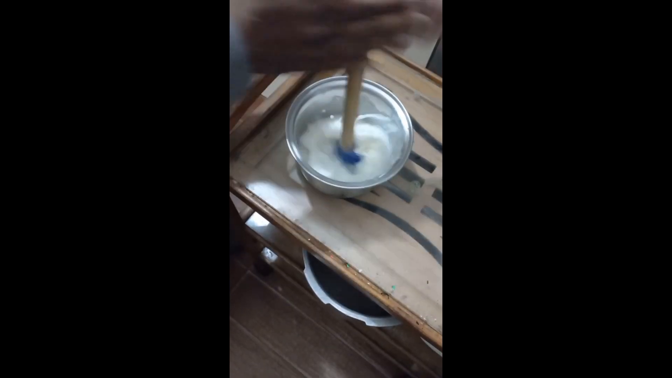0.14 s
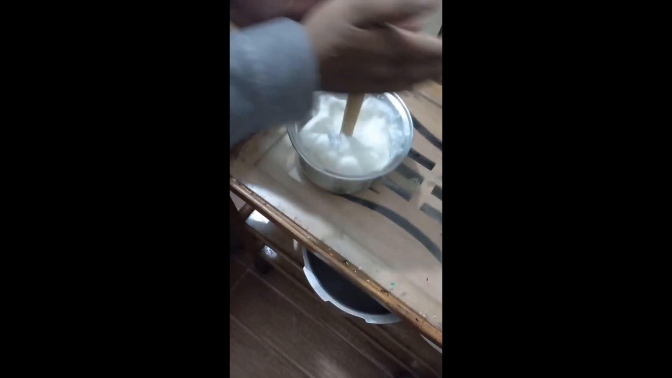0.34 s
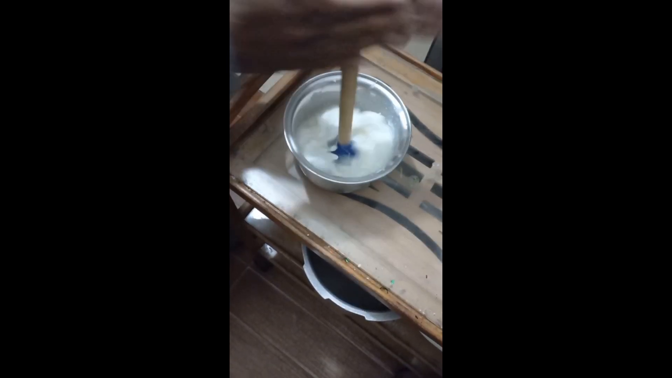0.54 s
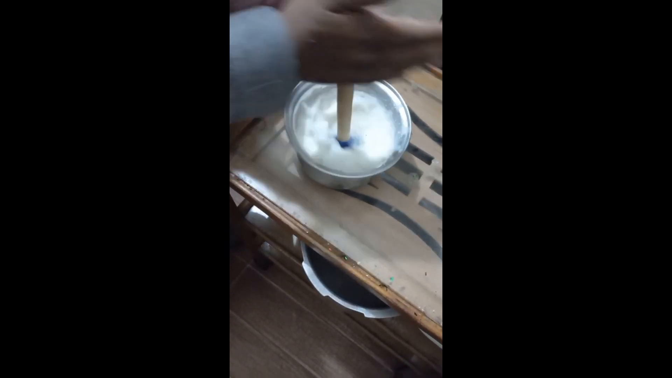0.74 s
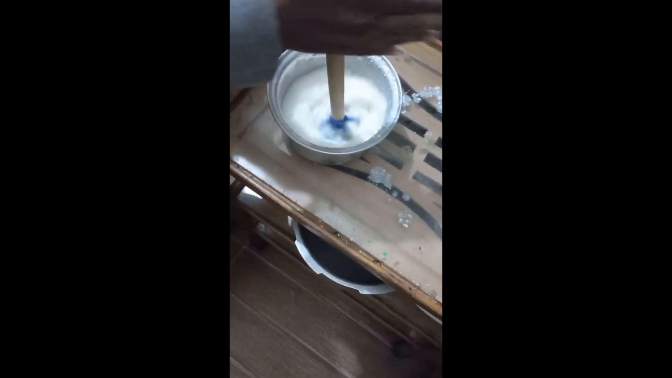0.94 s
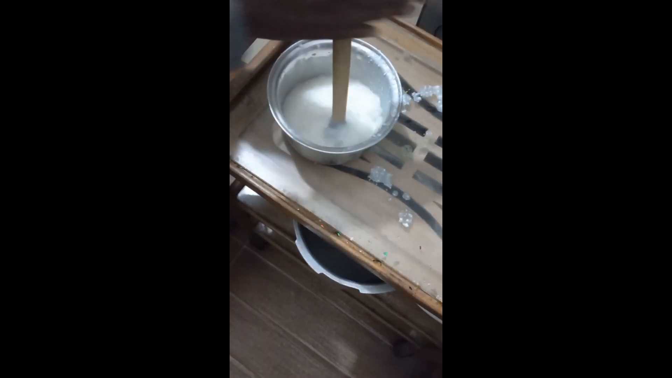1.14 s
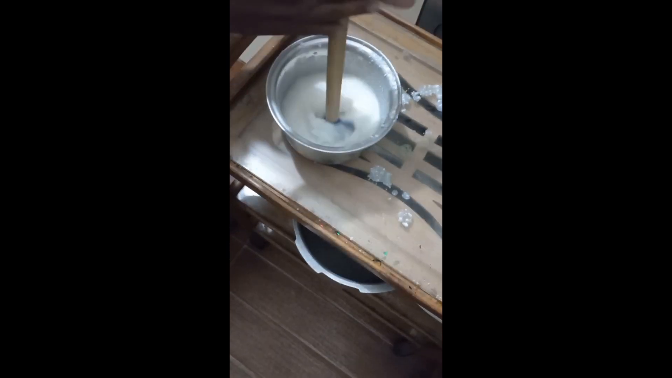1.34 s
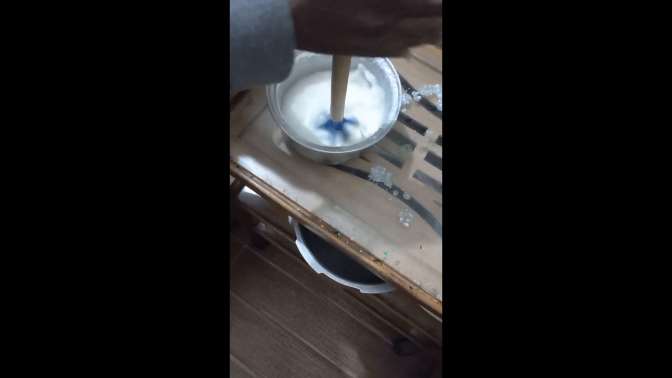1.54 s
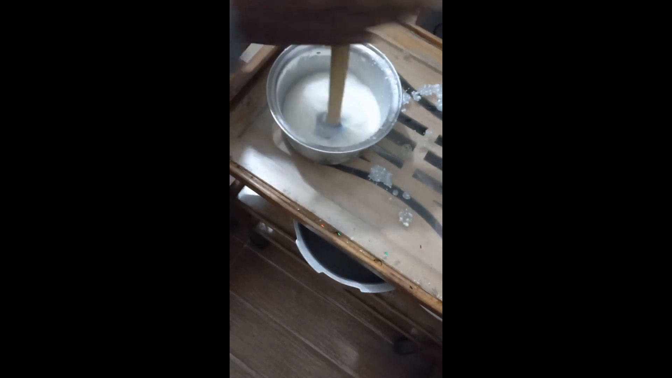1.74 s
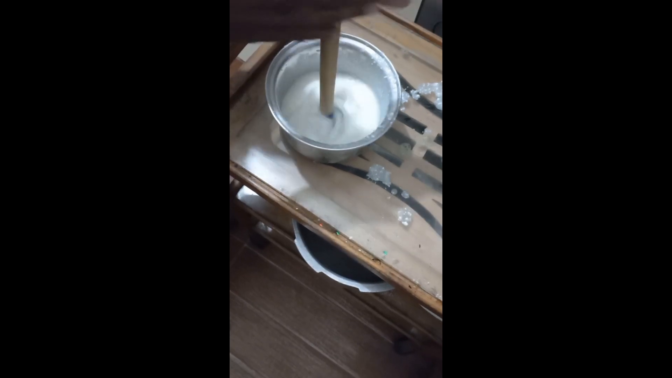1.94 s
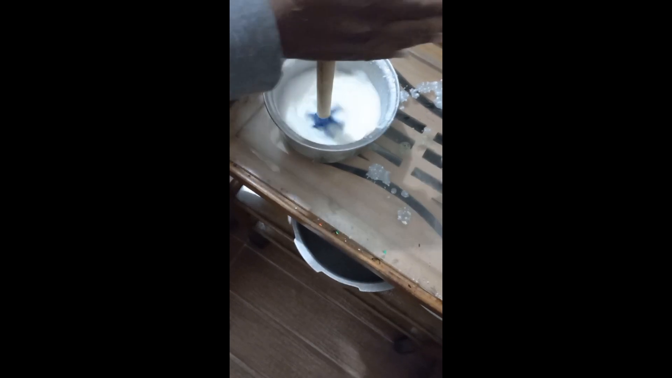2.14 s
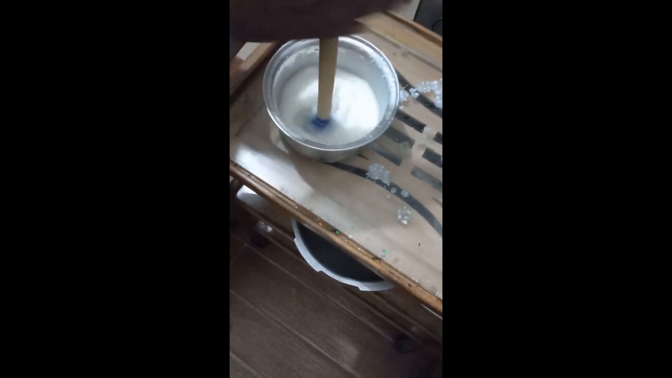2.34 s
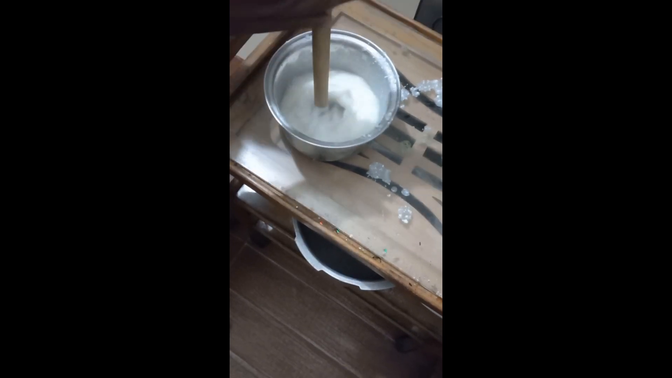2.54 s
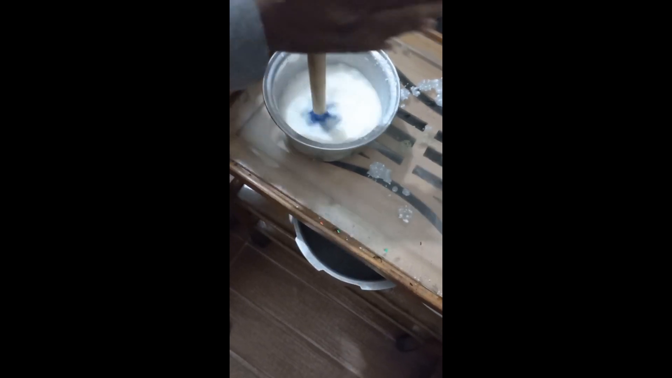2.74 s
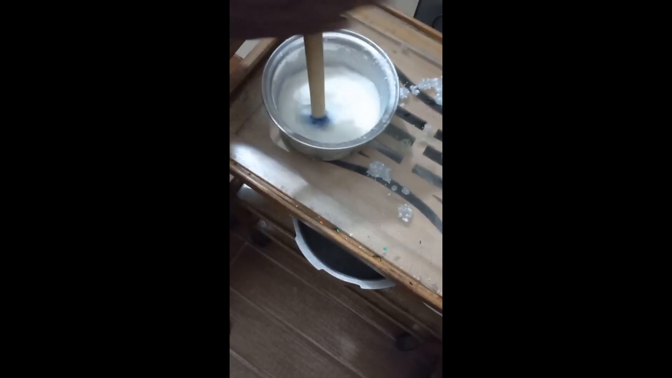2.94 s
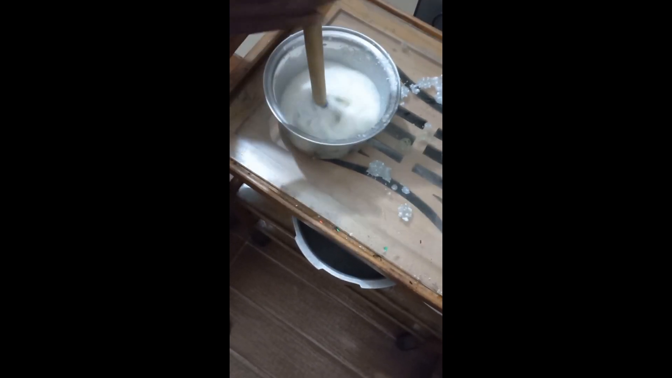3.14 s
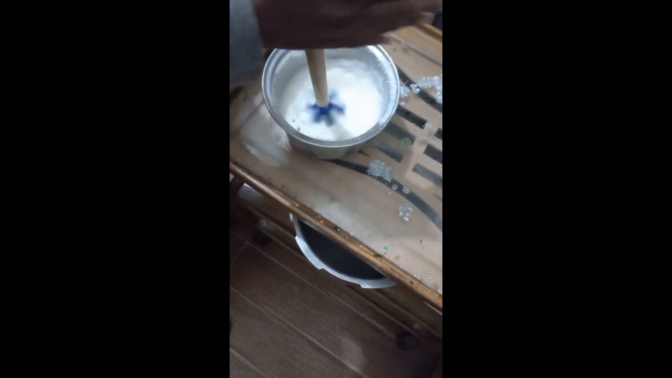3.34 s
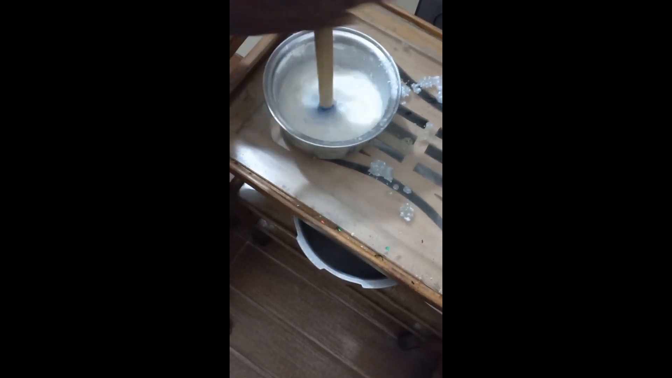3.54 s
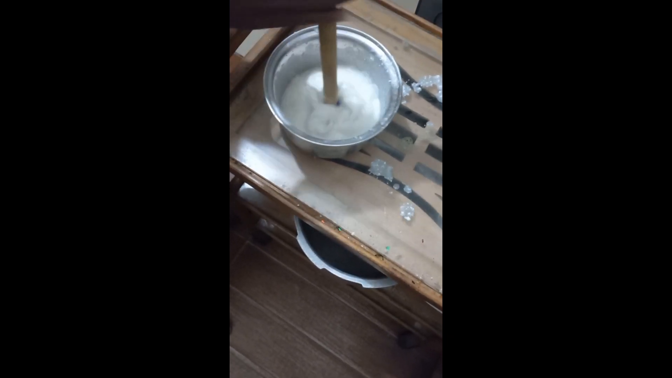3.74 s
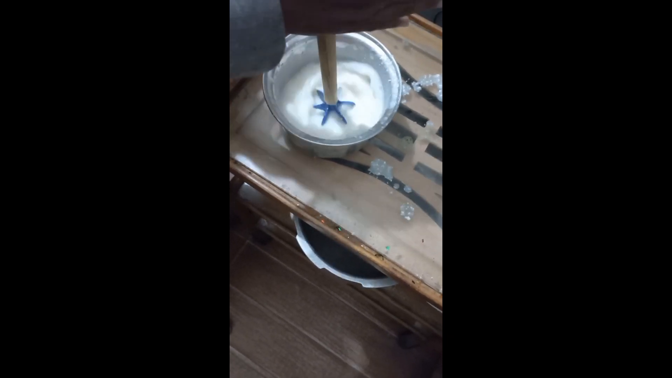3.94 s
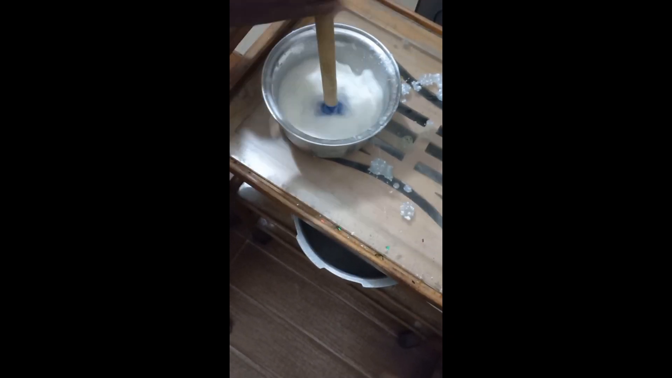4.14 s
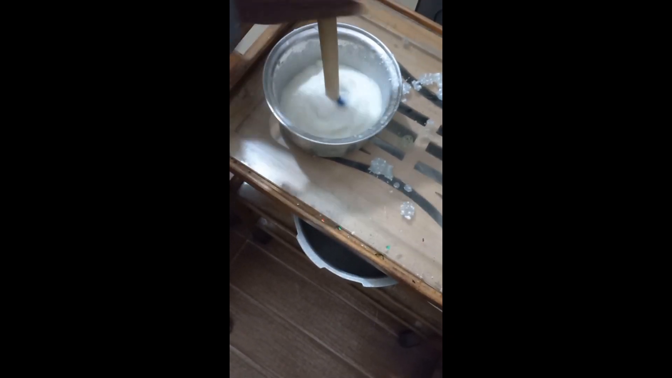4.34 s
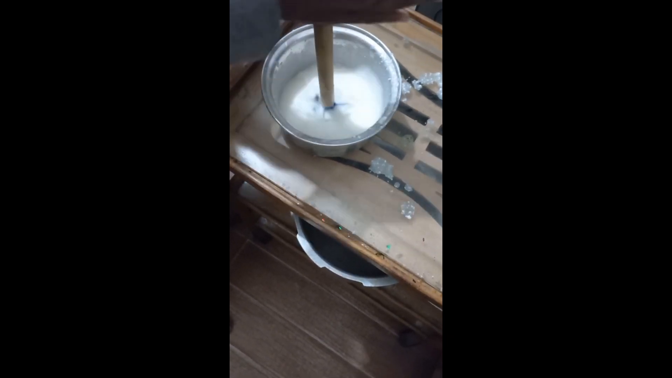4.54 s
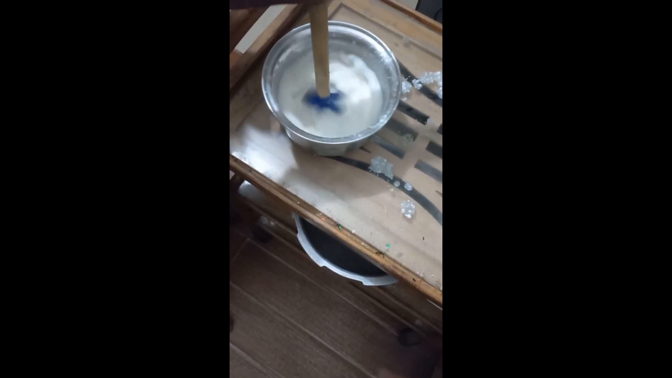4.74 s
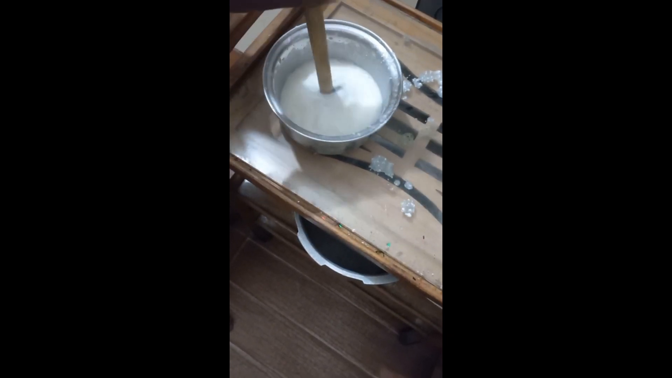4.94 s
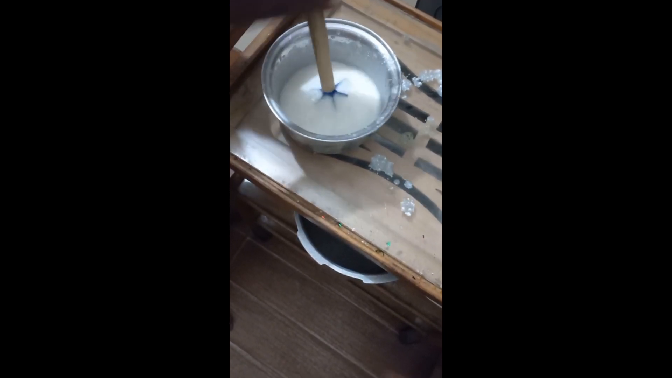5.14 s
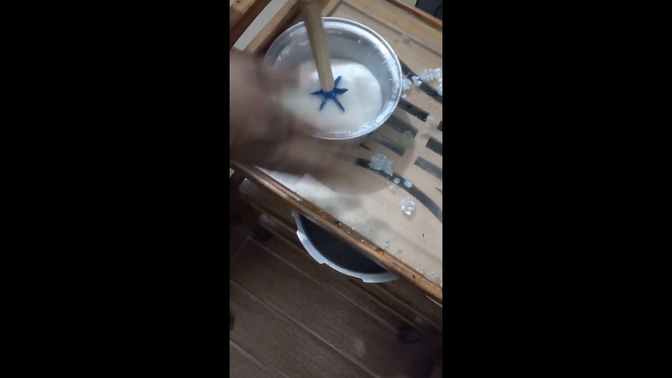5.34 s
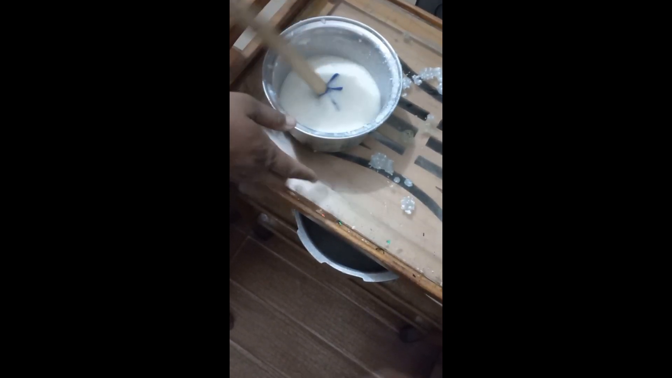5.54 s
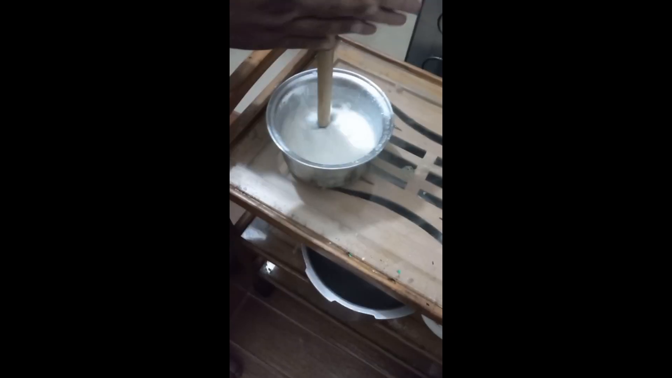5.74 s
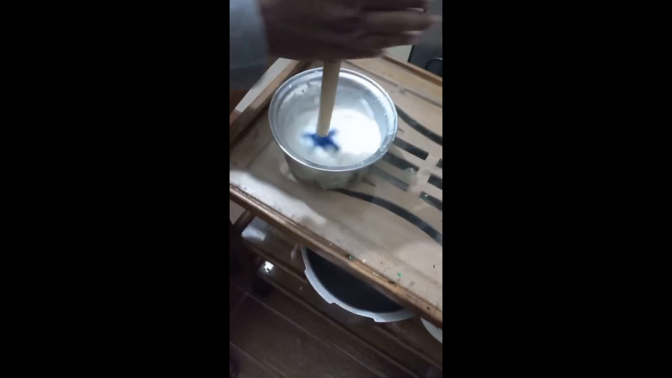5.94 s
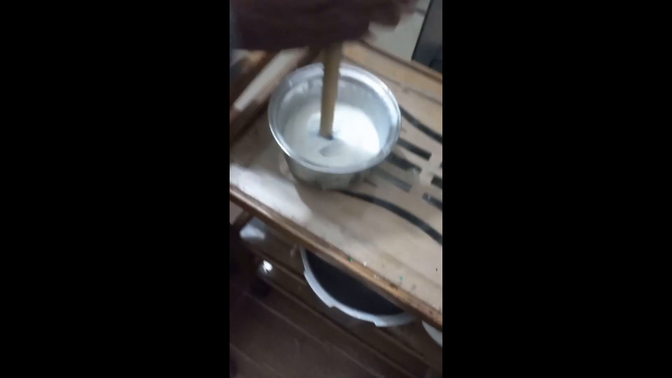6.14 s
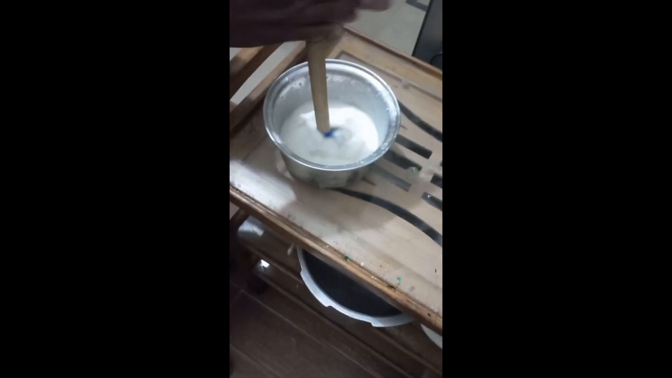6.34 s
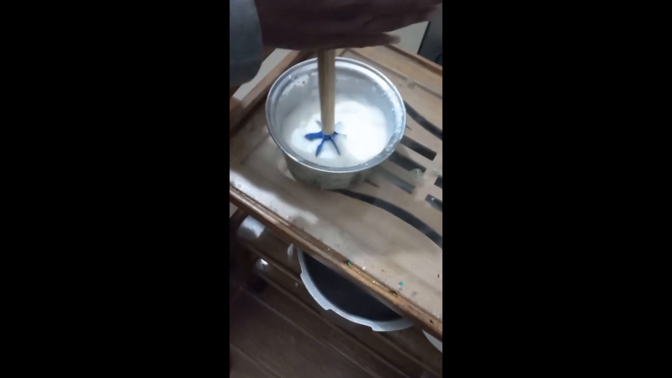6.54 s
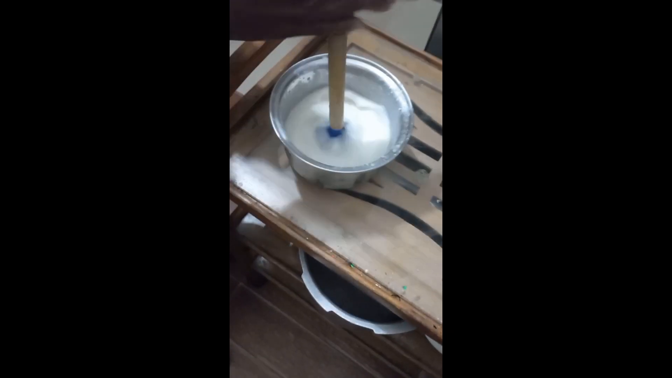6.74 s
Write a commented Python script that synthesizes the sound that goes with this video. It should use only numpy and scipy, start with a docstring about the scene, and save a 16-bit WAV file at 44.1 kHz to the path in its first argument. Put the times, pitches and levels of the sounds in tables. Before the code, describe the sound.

In a small quiet kitchen, two close microphones hear thick liquid being churned in a steel pot on a wooden table. From 0 to 0.78 seconds the strokes are loudest, dense and splashy, with popping bubbles, spray hiss and bright ticks on steel; a low table hum swells near 0.4. At 0.78 the sound cuts abruptly into a slightly softer passage. Until about 4.75, palm strokes come every 0.3 seconds, each a quick frothy gurgle with hollow metallic ringing and a short fall, some deeper, some fizzier, with stray bubbles and ticks between. From 4.8 to 5.59 the churning nearly vanishes, leaving faint air, tiny drips and table hum. At 5.59 wet sound jumps in suddenly, the table hums again around 5.7, and gentler, thinner strokes resume around 5.9, 6.2, 6.45 and 6.73, with bright bubbles and light ticks until the end at about 7.

```python
"""Churning thick liquid by hand

A wooden churner is rolled between the palms in a steel pot on a light wooden table, in a small kitchen.
Each stroke raises swarms of dying sines (bubbles) and hiss (spray); single bubbles and ticks stand out.
Resonances of the steel pot colour the bubbles strongly; a dense rattle makes the table's modes hum.
Two close microphones, the left a little nearer. The sound is cut abruptly twice: the churning drops out
at the first cut and jumps up at the second."""
import sys
import numpy as np
from scipy import signal
from scipy.fft import rfft, irfft, next_fast_len
from scipy.io import wavfile

SR = 44100
rng = np.random.default_rng(int(sys.argv[2]) if len(sys.argv) > 2 else 0)


def gain_from_db(level_db):
    """Convert decibel levels to linear amplitude factors (20 dB per decade)."""
    decades = np.asarray(level_db, float) / 20
    return 10 ** decades


def wav_out(sig):
    """Save sig, one row per channel (or a flat mono array), as 16-bit PCM at SR to the path in sys.argv[1]."""
    wavfile.write(sys.argv[1], SR, np.round(np.clip(np.atleast_2d(sig).T, -1, 1) * 32767).astype(np.int16))


N = 303849  # samples


def evened(x):
    """Scales to rms 1."""
    return x / np.sqrt(np.mean(x ** 2) + 1e-20)


def read(points, hz):
    """Interpolates (hz, value) points on a log-frequency axis."""
    point_hz, value = np.transpose(points)
    return np.interp(np.log(hz + 1), np.log(point_hz + 1), value)


def shaped(x, gain):
    """Filters by a function of frequency."""
    size = next_fast_len(x.shape[-1] + 2048)
    spectrum = rfft(x, size) * gain(np.fft.rfftfreq(size, 1 / SR))
    return irfft(spectrum, size)[..., :x.shape[-1]]


def modes(peaks, hz):
    """Summed causal response of resonances, each (mode_hz, width_hz, level_db)."""
    return sum(gain_from_db(db) * 1j * hz * width / (f ** 2 - hz ** 2 + 1j * hz * width) for f, width, db in peaks)


def add(mix, start_s, sound):
    """Mixes a sound in at start_s, cut at the end of the mix."""
    part = mix[round(start_s * SR):][:len(sound)]
    part += sound[:len(part)]


def blip(hz, t60_s, rise, onset_s):
    """A bubble: a dying sine whose pitch climbs as it nears the surface."""
    t = np.arange(int(t60_s * SR) + 8) / SR
    swing = np.sin(2 * np.pi * hz * (t + 0.5 * rise * t ** 2 / t60_s))
    return swing * gain_from_db(-60 * t / t60_s) * (1 - np.exp(-t / onset_s))


def crack(noise, hz, width, t60_s):
    """A quickly rising burst of noise around hz, partly different at the two microphones."""
    both = noise[0] + 1.8 * noise[1:]
    burst = shaped(both, lambda f: modes([(hz, width * hz, 0)], f) ** 2)
    t = np.arange(noise.shape[1]) / SR
    return (evened(burst) * gain_from_db(-60 * t / t60_s) * (1 - np.exp(-t / 0.00081))).T


# quiet kitchen air: (freq_hz, density_db)
AIR_SPECTRUM = [(20, 2.5), (60, -6.5), (100, 2.5), (300, -6.5), (700, -13), (3200, -19.5), (5500, -17),
                (8000, -22.5), (16500, -29.5)]


def kitchen_air():
    """Steady shaped noise, independent at each microphone."""
    noise = rng.standard_normal((2, N))
    return gain_from_db(-70.5) * evened(shaped(noise, lambda f: gain_from_db(read(AIR_SPECTRUM, f))))


# kitchen decay: (freq_hz, t60_s)
KITCHEN_DECAY = [(200, 0.1), (800, 0.27), (3000, 0.25), (12000, 0.1)]


def kitchen(x):
    """Sparse taps of random sign for each microphone, dying by band.

    Two tails alternate steadily, which keeps fixed stripes out of the spectrum."""
    length, spacing = SR // 3, 20  # samples
    taps = np.zeros((4, length))  # two tails x two microphones
    at = np.arange(100, length - 20, spacing) + rng.integers(0, spacing, (4, (length - 101) // spacing))
    np.put_along_axis(taps, at, rng.choice([-1., 1.], at.shape), 1)
    hz, t, z = signal.stft(taps, SR, nperseg=128)
    decay = gain_from_db(-60 * t / read(KITCHEN_DECAY, hz)[:, None])
    tail = signal.istft(z * decay, SR, nperseg=128)[1]
    tail /= np.linalg.norm(tail[0])
    phase = np.arange(4)[:, None] // 2 * np.pi / 2
    fed = x * np.cos(2 * np.pi * 3.1 * np.arange(len(x)) / SR + phase)
    wet = signal.oaconvolve(fed, tail, axes=1)[:, :len(x)]
    return wet.reshape(2, 2, -1).sum(0)


# table shaking: (time_s, frame_level_db, top_level_db)
TABLE_SHAKING = [(0.0, -44, -41), (0.04, -45, -38), (0.31, -39.5, -50.5), (0.38, -42.5, -33),
                 (0.44, -34, -37), (0.8, -58, -50.5), (1.09, -41, -40), (1.42, -52, -47),
                 (1.67, -36.5, -41.5), (2.01, -61, -51), (2.19, -42.5, -48), (2.3, -48, -44),
                 (3.03, -53.5, -48.5), (3.84, -48.5, -45), (4.05, -80, -56.5), (4.16, -41.5, -37.5),
                 (4.28, -52, -47.5), (4.81, -41.5, -44), (4.91, -49, -64), (4.95, -62, -44),
                 (5.078, -44, -42.5), (5.58, -62.5, -63.5), (5.72, -37.5, -34), (5.95, -59, -51),
                 (6.81, -58.5, -56), (6.89, -57, -70)]
# frame modes, then top modes: (mode_hz, width_hz, level_db)
TABLE_MODES = [
    [(125.84, 3.5, 2.5), (149.6, 17, -7), (185, 3.2, -18.5)],
    [(225, 0.76, 13.5), (247.8, 10.8, 10.5), (283, 9.3, 0.5)],
]


def table():
    """The spinning churner shakes the pot, and this dense rattle keeps the table's modes going."""
    time_s, *levels_db = np.transpose(TABLE_SHAKING)
    out = np.zeros((2, N))
    for peaks, level_db in zip(TABLE_MODES, levels_db):
        knocks = rng.random(N) < 500 / SR  # 500 per s
        rattle = (rng.standard_normal(N) + 0.099 * rng.standard_normal((2, N))) * knocks
        rattle = rattle * gain_from_db(1.84 * np.minimum(rng.exponential(1, N), 4))
        hum = shaped(rattle, lambda f: modes(peaks, f) / (1 + (f / 380) ** 6) / (1 + (65 / (f + 1)) ** 4))
        out += gain_from_db(np.interp(np.arange(N) / SR, time_s, level_db)) * evened(hum)
    return out


# droplets and vanes ticking on the steel: (start_s, level_db, centre_hz)
STEEL_TICKS = [(0.1664, -14, 5100), (0.168, -19.5, 11500), (0.195, -23, 5600), (0.206, -14, 3340),
               (0.285, -27, 12300), (0.352, -29, 3100), (0.488, -30, 11800), (0.6985, -22, 11700),
               (0.698, -25.5, 4100), (0.7123, -18.5, 5000), (0.754, -21, 13000), (0.904, -31.5, 12500),
               (0.958, -29, 5160), (1.095, -31, 2500), (1.148, -31, 4450), (1.157, -25.5, 4700),
               (1.4354, -28.5, 13200), (1.775, -22, 6150), (1.956, -38, 4730), (2.085, -27, 3730),
               (2.0915, -35, 12000), (2.3273, -27.5, 3650), (2.377, -14, 3320), (2.428, -33, 12500),
               (2.6786, -21, 4960), (2.758, -32.5, 12100), (2.922, -31, 3570), (3.041, -24.5, 5700),
               (3.072, -21, 5740), (3.2452, -24.5, 5500), (3.288, -34, 13600), (3.5013, -32, 4600),
               (3.524, -20, 3620), (3.577, -18, 4870), (3.605, -21.5, 6540), (3.7728, -28, 4140),
               (3.8673, -30, 12200), (3.901, -23.5, 5300), (3.912, -29, 12500), (4.1749, -20, 10800),
               (4.372, -35, 10500), (4.4515, -31, 4800), (4.496, -29, 4660), (4.506, -34, 5330),
               (4.6, -36, 4600), (4.694, -35, 3150), (4.9305, -50, 4900), (5.072, -48, 3200),
               (5.2738, -48.5, 4350), (5.624, -31, 3530), (5.69, -30.5, 5960), (5.712, -43, 12500),
               (5.789, -26.5, 3280), (5.8778, -28.5, 4700), (5.9675, -34.5, 4120), (6.026, -41, 5000),
               (6.044, -38.5, 6300), (6.1393, -40, 4220), (6.2037, -45, 7040), (6.221, -38, 12500),
               (6.2334, -28, 4220), (6.246, -41, 8140), (6.49, -33, 11700), (6.553, -37, 12500),
               (6.686, -29, 2930), (6.7437, -33.5, 5950), (6.785, -31.5, 12000), (6.8104, -28, 4700),
               (6.834, -28, 3830)]


def ticks():
    """Each tick is a short noise burst around its centre plus a fainter, longer treble burst."""
    out = np.zeros((N, 2))
    for start_s, level_db, hz in STEEL_TICKS:
        noise = rng.standard_normal((3, 1024))
        add(out, start_s, gain_from_db(level_db + 2.5) * crack(noise, hz, width=0.44, t60_s=0.015))
        add(out, start_s, gain_from_db(level_db - 13.0) * crack(noise[::-1], 11500.0, width=1.0, t60_s=0.023))
    return out.T


# bubbles that stand out: (start_s, level_db, pitch_hz at the start, t60_s)
SINGLE_BUBBLES = [(0.087, -18.5, 1420, 0.04), (0.139, -19.5, 1583, 0.028), (0.172, -26.5, 531, 0.19),
                  (0.197, -14.5, 1180, 0.023), (0.204, -24.5, 774, 0.1), (0.354, -17.5, 953, 0.036),
                  (0.353, -19.5, 3020, 0.037), (0.469, -13.5, 1580, 0.018), (0.488, -15, 1057, 0.024),
                  (0.583, -13.5, 620, 0.03), (0.66, -21.5, 927, 0.046), (0.703, -22, 1086, 0.046),
                  (0.715, -10, 1316, 0.021), (0.749, -13.5, 634, 0.023), (0.851, -18, 516, 0.042),
                  (1.0955, -23.5, 603, 0.035), (1.147, -25, 420, 0.093), (1.159, -15, 2090, 0.028),
                  (1.204, -17, 615, 0.039), (1.511, -14.5, 1033, 0.022), (1.699, -26, 990, 0.028),
                  (1.705, -22, 1474, 0.033), (1.719, -21, 2257, 0.047), (1.862, -21.5, 1920, 0.032),
                  (2.0315, -17.5, 950, 0.056), (2.0858, -10, 1820, 0.015), (2.096, -36, 1940, 0.06),
                  (2.3, -25, 1020, 0.024), (2.306, -28.5, 335, 0.078), (2.375, -22, 944, 0.06),
                  (2.378, -14, 1644, 0.032), (2.404, -26.5, 700, 0.17), (2.448, -21.5, 652, 0.065),
                  (2.56, -22, 1530, 0.024), (2.68, -14, 1550, 0.016), (2.709, -22, 884, 0.032),
                  (2.779, -34.5, 736, 0.11), (2.874, -28.5, 1073, 0.11), (2.884, -25, 1200, 0.035),
                  (2.896, -19, 1415, 0.04), (3.165, -26, 756, 0.049), (3.238, -17.5, 1375, 0.035),
                  (3.502, -24, 1810, 0.036), (3.511, -17, 482, 0.037), (3.628, -19, 1184, 0.036),
                  (3.79, -18, 490, 0.038), (3.908, -9.5, 1560, 0.019), (4.06, -28, 605, 0.054),
                  (4.061, -24, 1480, 0.019), (4.081, -25.5, 307, 0.087), (4.098, -24, 650, 0.025),
                  (4.098, -25, 960, 0.026), (4.126, -23.5, 1466, 0.047), (4.134, -14.5, 567, 0.031),
                  (4.162, -14.5, 325, 0.033), (4.162, -19, 529, 0.072), (4.327, -26.5, 1430, 0.04),
                  (4.341, -28, 319, 0.084), (4.385, -18.5, 2135, 0.027), (4.717, -30, 317, 0.15),
                  (4.724, -18.5, 514, 0.03), (4.931, -41.5, 1590, 0.043), (4.993, -31, 3250, 0.027),
                  (5.026, -56, 3310, 0.12), (5.139, -47, 514, 0.24), (5.594, -27.5, 2180, 0.058),
                  (5.624, -23, 1700, 0.034), (5.665, -26, 2830, 0.022), (5.696, -24.5, 235.6, 0.09),
                  (5.748, -34.5, 1520, 0.045), (5.788, -21.5, 2590, 0.036), (5.808, -32, 691, 0.17),
                  (5.892, -21.5, 1447, 0.017), (5.983, -35.5, 1380, 0.052), (6.11, -50, 605, 0.18),
                  (6.154, -35, 953, 0.032), (6.17, -31, 1375, 0.044), (6.203, -34, 2300, 0.034),
                  (6.414, -40, 700, 0.15), (6.418, -25.5, 1900, 0.023), (6.452, -21.5, 3035, 0.024),
                  (6.485, -10, 1580, 0.014), (6.552, -28.5, 1320, 0.044), (6.721, -25, 1490, 0.023),
                  (6.741, -27, 1350, 0.03), (6.787, -19.5, 1600, 0.03)]


def single_bubbles():
    """Each bubble is a rising, dying sine, begun by the slap that traps it."""
    out = np.zeros((N, 2))
    for start_s, level_db, hz, t60_s in SINGLE_BUBBLES:
        noise = rng.standard_normal((3, 1024))
        add(out, start_s, gain_from_db(level_db) * blip(hz, t60_s, rise=0.3, onset_s=1.65 / hz)[:, None])
        add(out, start_s, gain_from_db(level_db - 12.0) * crack(noise, 1.02 * hz, width=0.93, t60_s=0.03))
    return out.T


# liquid as the microphones hear it: (freq_hz, density_db)
LIQUID_COLOUR = [(180, -31.5), (300, -7.5), (420, -5.5), (539, -1.5), (848, -2.5), (923, -11.5),
                 (1090, -8.5), (1550, -1), (4240, -13.5), (5830, -15.5), (8160, -27), (13700, -16),
                 (15700, -10), (16500, -37)]


def swarm(lo_hz, hi_hz, per_s, cycles, spread_db, hiss, scatter, count):
    """Random bubbles of a size range over unresolved hiss; each reaches the two microphones unequally."""
    size = gain_from_db(spread_db * np.minimum(rng.exponential(1, N), 4)) * (rng.random(N) < per_s / SR)
    size = size * (1 + scatter * rng.standard_normal((2, N)))
    kind = rng.integers(0, count, N)
    bubbles = np.zeros((2, N))
    for k, hz in enumerate(np.geomspace(lo_hz, hi_hz, count)):
        t60_s = cycles * rng.uniform(0.8, 2.8) / hz
        grain = blip(hz, t60_s, rng.uniform(0, 0.45), 2 / hz)
        grain = grain * np.sqrt(hz) / np.linalg.norm(grain)
        at = np.flatnonzero((size[0] != 0) & (kind == k))
        span = (at[:, None] + np.arange(len(grain))).ravel()
        for side in range(2):
            grains = np.outer(size[side, at], grain).ravel()
            bubbles[side] += np.bincount(span, grains, N + len(grain))[:N]

    def edges(f):
        return 1 / (1 + (lo_hz / (f + 1)) ** 6) / (1 + (f / hi_hz) ** 6)

    noise = rng.standard_normal(N) + scatter * rng.standard_normal((2, N))
    fine = shaped(noise, edges)
    mixed = np.sqrt(1 - hiss) * evened(bubbles) + np.sqrt(hiss) * evened(fine)
    return evened(shaped(mixed, lambda f: gain_from_db(read(LIQUID_COLOUR, f)) * np.sqrt(edges(f))))


# steel wall: (mode_hz, width_hz, level_db)
POT_MODES = [(424.6, 25, -14), (532.4, 11, -8), (700, 20, -6.5), (927, 5.9, -1), (953, 16.5, -2),
             (1020, 17, -8.5), (1420, 16, -16.5)]


def liquid(froth_db, later_db, large_db, spray_db):
    """Five sizes of bubbles follow the strokes in uneven surges; the pot colours large and froth sizes.

    later_db, large_db and spray_db are relative to froth_db."""
    large = swarm(294.0, 815, per_s=200, cycles=7.6, spread_db=2.0, hiss=0.2, scatter=0.25, count=7)
    froth = swarm(831, 1473, per_s=260, cycles=13.0, spread_db=2.8, hiss=0.16, scatter=0.73, count=14)
    small = swarm(1430, 2554, per_s=350, cycles=17.0, spread_db=2.6, hiss=0.14, scatter=1.0, count=14)
    fizz = swarm(1990, 4000, per_s=550, cycles=20.0, spread_db=3.0, hiss=0.12, scatter=1.0, count=12)
    spray = swarm(3345, 14040, per_s=900, cycles=22.0, spread_db=2.4, hiss=0.68, scatter=1.5, count=18)
    # strokes poor in large bubbles shift their froth to the smaller sizes: 0.11 dB per dB
    shift_db = 0.11 * np.clip(large_db, -20, 10)
    froth = gain_from_db(shift_db - 1.0) * froth + gain_from_db(later_db - shift_db - 3.5) * small
    # vanes scoop the liquid in lumps: level wavers at about 10-30 Hz
    surges = shaped(rng.standard_normal((2, N)),
                    lambda f: 1 / (1 + (f / 30) ** 4) / (1 + (10 / (f + 0.1)) ** 4))
    large_surge_db, froth_surge_db = 1.72 * evened(surges)
    body = gain_from_db(froth_db + large_db + large_surge_db) * large + gain_from_db(froth_db + froth_surge_db) * froth
    ringing = shaped(body, lambda f: gain_from_db(-3.5) + gain_from_db(8.5) * modes(POT_MODES, f))
    fine = gain_from_db(0.54 * spray_db - 1.5) * fizz + gain_from_db(spray_db) * spray  # small bubbles come with the spray
    return ringing + gain_from_db(froth_db + 1.1 * froth_surge_db) * fine


# abrupt cuts, churning drops out at the first and jumps up at the second: time_s
CUTS_S = [0.7755, 5.5925]


def answer_db(start_s, length_s, level_db, climb_db_per_s, change_db, fall_db_per_s):
    """Level of one bubble size: climbs to each stroke, holds or drifts, falls; strokes add in power."""
    t = np.arange(0, N + 32, 32)[:, None] / SR
    since = t - start_s
    held_db = level_db + climb_db_per_s * np.minimum(since, 0) + change_db * np.clip(since / length_s, 0, 1)
    power = gain_from_db(2 * (held_db - fall_db_per_s * np.maximum(since - length_s, 0)))
    # a stroke is confined to its own side of each cut
    unbroken = np.searchsorted(CUTS_S, t) == np.searchsorted(CUTS_S, start_s + length_s / 2)
    total_db = 10 * np.log10((power * unbroken).sum(1) + 1e-14)
    return np.interp(np.arange(N) / SR, t[:, 0], total_db)


# palm rolls or leftover sloshes: (start_s, length_s, froth_db, large_db, large_lead_s)
PALM_STROKES = [(-0.032, 0.015, -26.5, -39, 0.027), (0.105, 0.019, -35, -49, 0.035),
                (0.164, 0.052, -31.5, -41.5, -0.024), (0.267, 0.11, -32.5, -41.5, -0.096),
                (0.5, 0.1, -33.5, -41.5, -0.023), (0.697, 0.016, -29.5, -32, -0.012),
                (0.854, 0.046, -33.5, -38.5, 0.011), (1.126, 0.15, -37, -37, 0.026),
                (1.424, 0.075, -35.5, -37.5, -0.045), (1.718, 0.11, -35, -40, 0.02),
                (2.017, 0.072, -32.5, -44.5, 0.0051), (2.329, 0.066, -33, -39, 0.0059),
                (2.63, 0.099, -38.5, -46, 0.025), (2.901, 0.12, -38.5, -44, 0.023),
                (3.214, 0.089, -35, -45.5, 0.065), (3.532, 0.07, -30.5, -39.5, 0.026),
                (3.738, 0.18, -37, -44.5, 0.034), (4.093, 0.069, -35, -36.5, -0.00097),
                (4.285, 0.22, -39.5, -46.5, 0.033), (4.643, 0.087, -37.5, -41.5, -0.029),
                (4.922, 0.19, -65.5, -63, 0.052), (5.112, 0.21, -76.5, -75, -0.071),
                (5.549, 0.14, -42, -52.5, -0.0078), (5.886, 0.038, -45.5, -53, 0.013),
                (6.195, 0.041, -36.5, -50, 0.05), (6.417, 0.1, -40.5, -53.5, 0.0025),
                (6.726, 0.034, -34.5, -48.5, 0.0022)]
# spray that each stroke throws: (start_s, length_s, level_db)
THROWN_SPRAY = [(-0.027, 0.026, -34.5), (0.104, 0.082, -44.5), (0.176, 0.12, -40.5), (0.307, 0.092, -42),
                (0.489, 0.088, -37.5), (0.718, 0.022, -36), (0.864, 0.094, -43), (1.17, 0.12, -43.5),
                (1.437, 0.18, -46.5), (1.732, 0.12, -43.5), (2.023, 0.11, -45.5), (2.356, 0.058, -41),
                (2.619, 0.13, -47), (2.968, 0.092, -43), (3.249, 0.077, -44), (3.56, 0.087, -42),
                (3.8, 0.13, -43.5), (4.104, 0.09, -43.5), (4.369, 0.14, -47.5), (4.714, 0.01, -41),
                (4.904, 0.079, -64.5), (5.081, 0.23, -74.5), (5.606, 0.096, -46.5), (5.787, 0.14, -55),
                (6.187, 0.14, -53), (6.49, 0.012, -45), (6.732, 0.069, -47.5)]
# how each size answers: (climb_db_per_s, change_db while it lasts, fall_db_per_s)
LARGE_ANSWER = (250, 0.076, 105)
FROTH_ANSWER = (294, 0.09, 157)
SPRAY_ANSWER = (194, 0.24, 180)


def churning():
    """Palm strokes drive the bubble sizes, the smaller froth 18 ms after the larger."""
    start_s, length_s, froth, large, lead_s = np.transpose(PALM_STROKES)
    froth_db = answer_db(start_s, length_s, froth, *FROTH_ANSWER)
    later_db = answer_db(start_s + 0.018, length_s, froth, *FROTH_ANSWER)
    large_db = answer_db(start_s - lead_s, length_s, large, *LARGE_ANSWER)
    spray_db = answer_db(*np.transpose(THROWN_SPRAY), *SPRAY_ANSWER)
    return liquid(froth_db, later_db - froth_db, large_db - froth_db, spray_db - froth_db)


def scene():
    """Pot, table, kitchen and air; the reverberation also stops at the first cut."""
    pot = churning() + single_bubbles() + ticks()
    cut = round(CUTS_S[0] * SR)
    room = np.hstack([kitchen(pot[0, :cut]), kitchen(pot[0, cut:])])
    left, right = pot + table()
    lead = 7  # samples by which the nearer left side is early
    direct = np.array([np.pad(left[lead:], (0, lead)), right])
    return direct + gain_from_db(-6.5) * room + kitchen_air()


def roll_off(x):
    """The treble ends steeply here."""
    return signal.sosfilt(signal.butter(12, 17000, fs=SR, output="sos"), x)


# left over right: (freq_hz, difference_db)
LEFT_OVER_RIGHT = [(60, 4.5), (150, 1), (380, 3), (950, 1), (2380, 1.0), (5980, -2), (8500, 5.5),
                   (15000, 2.5)]


def record(dry):
    """Two unequal microphones and a band limit in two steps."""
    edge_hz, shelf_hz = 15790, 16650
    sides = np.array([[0.5], [-0.5]])

    def limit(f):
        return (0.2 + 1 / (1 + (f / edge_hz) ** 300)) / (1 + (f / shelf_hz) ** 300)

    heard = shaped(dry, lambda f: gain_from_db(sides * read(LEFT_OVER_RIGHT, f)) * limit(f))
    return roll_off(heard)


dry = scene()
out = record(dry)
wav_out(out)
```